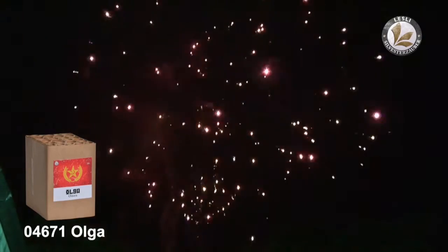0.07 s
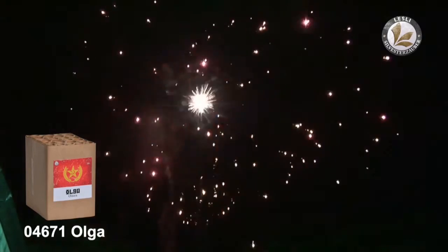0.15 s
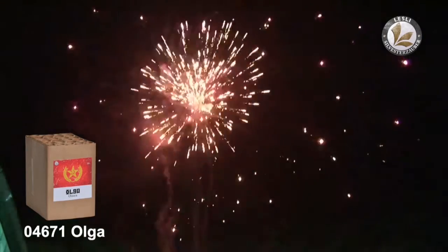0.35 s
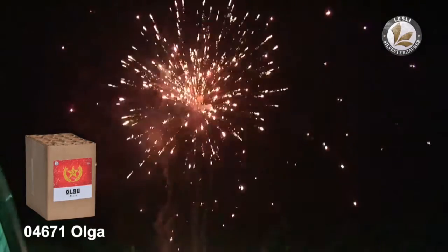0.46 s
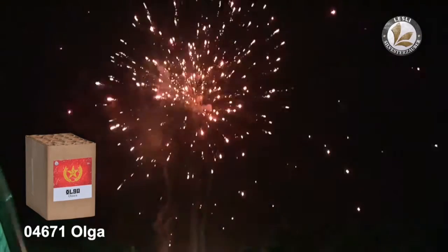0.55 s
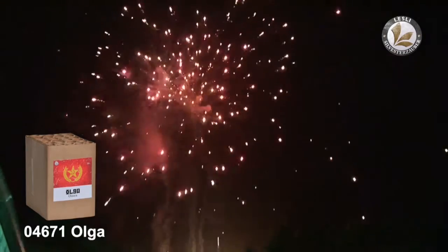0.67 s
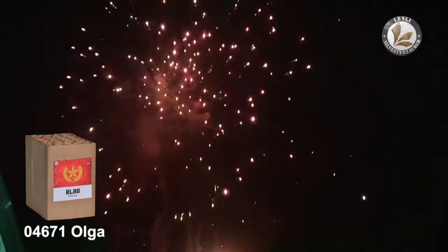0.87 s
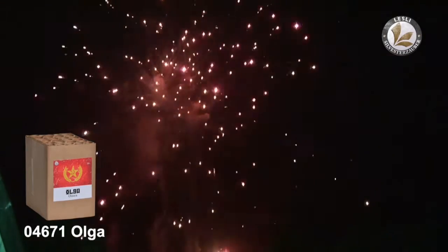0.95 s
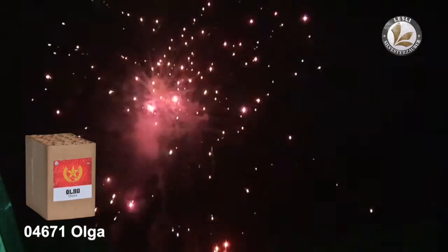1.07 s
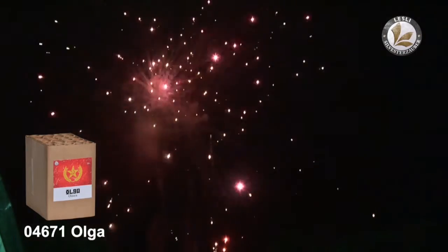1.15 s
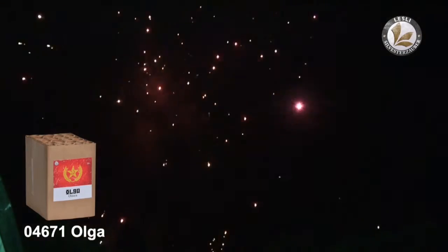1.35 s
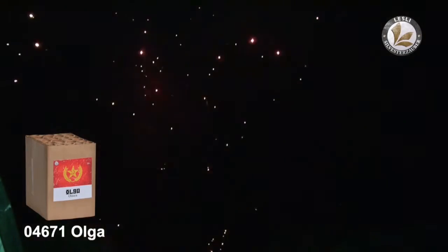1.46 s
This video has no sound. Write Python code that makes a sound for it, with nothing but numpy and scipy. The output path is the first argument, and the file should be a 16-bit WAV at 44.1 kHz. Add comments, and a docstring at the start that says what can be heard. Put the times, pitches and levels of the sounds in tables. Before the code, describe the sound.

A firework shell bursts with one sharp, loud bang just after a faint distant rumble. The bang briefly overloads the microphone, then rolls away across open ground with a few dull echoes over a faint sizzle of sparks.

```python
"""A firework shell bursts over open ground at night. At first the distant rumble of an earlier shot dies away
and burning stars hiss. At 0.24 s a thump from the mortar tube and the launch open a quick cluster of pressure
fronts, with ground scatter and hollow rings, that overloads the microphone. The surroundings then reflect a
dense roll and a few slaps. From 0.5 s the shot's own far rumble joins in, and the echoes decay over the hiss."""
import sys
import numpy as np
from scipy import signal
from scipy.fft import rfft, irfft
from scipy.io import wavfile
from scipy.ndimage import uniform_filter1d

SR = 44100
rng = np.random.default_rng(int(sys.argv[2]) if len(sys.argv) > 2 else 0)


def file_out(sig):
    """Save sig as 16-bit WAV at sys.argv[1]."""
    # one column per channel
    cols = np.atleast_2d(sig).T
    # limit, then scale
    lim = np.clip(cols, -1, 1)
    pcm = np.round(lim * 32767).astype(np.int16)
    wavfile.write(sys.argv[1], SR, pcm)


N = 66150
T = np.arange(N) / SR


def blast_wave(start, db, push_ms, pan_db, cutoff_hz, suction_gain=1.07):
    """Blast wave: a sudden overpressure, then a longer suction, dulled by air absorption."""
    phase = np.maximum(T - start, 0) / (push_ms / 1000)
    pressure = (T >= start) * (1 - phase) * np.exp(-phase)
    pressure = np.where(pressure > 0, pressure, suction_gain * pressure)
    return amp([[db + pan_db / 2], [db - pan_db / 2]]) * lowpass(pressure, cutoff_hz, order=2)


# Pressure fronts: t/s, level/dB, push duration/ms, left minus right/dB, cutoff f/Hz
PRESSURE_FRONTS = [(.2390, -2.5, 0.18, 5, 1400), (0.2454, 16, 0.31, 1, 3070), (0.2479, 1.5, 1.7, -2.5, 700),
                   (0.2624, 17.5, .55, -12, 7000), (0.2638, 6, 3.86, -7, 7050), (0.2729, 5.5, 2.7, 1, 910),
                   (0.2774, -10, 0.22, 6, 6000), (0.287, 6.5, 0.36, 8, 2800), (0.2864, -0.5, 1.8, 3, 1190)]
def burst():
    """Superposition: closely spaced blast waves, in inverted polarity, add to one bang."""
    return -sum(blast_wave(*front) for front in PRESSURE_FRONTS)


# Modes excited by the bang: t/s, f/Hz, level/dB, 60 dB decay time/s, rise time/s
HOLLOW_MODES = [(.2392, 900, -9, 0.013, 0.00024), (.2460, 669, -10, 0.055, 0.0026),
                (0.2502, 210, -6.5, 0.031, 0.00075), (0.28, 289.7, -8.5, 0.3, 0.01)]
def hollow_rings():
    """Damped resonance: each mode builds up quickly and decays exponentially."""
    rings = np.zeros(N)
    for start, hz, db, t60, rise in HOLLOW_MODES:
        age = np.maximum(T - start, 0)
        envelope = np.minimum(age / rise, 1) * amp(db - 60 * age / t60)
        rings += envelope * np.sin(2 * np.pi * hz * age)
    return rings


# Spectrum of the ground scatter: f/Hz, relative density/dB
GROUND_SPECTRUM = [(30, -14), (100, 2), (300, 4), (600, 2), (900, -5), (1400, -4.5), (2500, -8.5),
                   (5000, -17), (8000, -20), (15000, -31)]
# Clumps of that scatter: t/s, level/dB, time constant/s
GROUND_CLUMPS = [(0.2395, -18.5, 0.0078), (0.2446, -11.5, 0.0042), (0.2539, -17, .012),
                 (.2610, -9.5, 0.0024), (.2690, -17, 0.012), (0.276, -11, 0.013), (0.2844, -24.5, 0.014)]
# Stereo width of this and the later diffuse echoes: f/Hz, side minus mid/dB
ECHO_WIDTH = [(60, -3), (150, -9), (380, -8), (950, -7.5), (2380, -7), (5980, -2), (15000, 5.5)]
def ground_scatter():
    """Scattering: the ground close by returns the fronts as fast-decaying clumps of noise."""
    envelope = sum((T >= start) * amp(db) * np.exp(-np.maximum(T - start, 0) / decay)
                   for start, db, decay in GROUND_CLUMPS)
    return envelope * diffuse_noise(GROUND_SPECTRUM, ECHO_WIDTH, grain_db=4.5)


# Spectrum of the roll: f/Hz, relative density/dB
ROLL_SPECTRUM = [(15, -58), (25, -36), (33, -23.5), (169, -1), (253, -1), (281, 0), (349, -2), (410, 2),
                 (631, -3.5), (684, -4), (871, -9.5), (1200, -8), (1380, -13.5), (2060, -13), (2360, -15.5),
                 (8350, -25), (15500, -42)]
# Slow sag before the free decay: f/Hz, duration/s
ROLL_HOLD_TIME = [(50, 0.37), (250, 0.26), (500, 0.29), (1200, 0.24), (4000, 0.24), (9000, .21),
                  (14000, 0.2)]
# Free decay: f/Hz, 60 dB decay time/s
ROLL_DECAY_TIME = [(50, 0.87), (200, 0.92), (500, 1.19), (1200, 1.47), (3000, 1.5), (7000, 1.02),
                   (14000, 0.58)]
def roll(start=0.2556, rise_s=0.013, db=-15.5, sag_db_per_s=15.5):
    """Reverberation: dense echoes swell, sag slowly, then decay at a rate set by frequency."""
    echoes = diffuse_noise(ROLL_SPECTRUM, ECHO_WIDTH, grain_db=1)
    hz, t, bands = signal.stft(echoes, SR, nperseg=512)
    age = np.maximum(t - start, 0)
    decay_age = np.maximum(age - read(ROLL_HOLD_TIME, hz)[:, None], 0)
    sag_db = sag_db_per_s * (age - decay_age)
    decay_db = 60 * decay_age / read(ROLL_DECAY_TIME, hz)[:, None]
    _, fading = signal.istft(bands * amp(db - sag_db - decay_db), SR, nperseg=512)
    return fading[:, :N] * np.clip((T - start) / rise_s, 0, 1)


# Returns from far walls: t/s, level/dB, push duration/ms, left minus right/dB, cutoff f/Hz
WALL_ECHOES = [(0.3092, -5.5, 0.83, 4, 800), (0.4539, -4, 1.0, -6.5, 1310), (.4580, -11, 0.37, 17, 1200),
               (0.4765, -4.5, 0.93, -3.5, 1770), (0.649, -7, 1.1, -7, 1400), (.6523, -3.5, 0.81, -9, 1090),
               (0.6566, -11, 1, -3, 1100), (0.667, -12, 0.88, 0, 990), (.8140, -18, 2.8, 1, 900),
               (1.1605, -27, 0.63, -3, 990)]
def wall_slaps():
    """Specular reflection: far walls return single dull copies of the blast, with bass lost."""
    return highpass(sum(blast_wave(*echo) for echo in WALL_ECHOES), hz=157)


# Returns from distant houses or trees: peak t/s, level/dB, 1/e half-width/s
BROAD_ECHOES = [(0.379, -16.5, 0.0077), (.657, -25.5, 0.027), (.875, -40.5, 0.059), (0.938, -39.5, 0.016),
                (1.093, -43.5, 0.032)]
# Their spectrum: f/Hz, relative density/dB
BROAD_SPECTRUM = [(30, -37), (100, -16), (180, 1), (550, 6.5), (850, -14), (1250, 0.5), (1600, -19),
                  (4000, -27), (15000, -55)]
def broad_echoes():
    """Diffuse reflection: houses or trees smear the blast into bell-shaped swells."""
    envelope = sum(amp(db) * np.exp(-((T - peak) / half) ** 2) for peak, db, half in BROAD_ECHOES)
    return envelope * diffuse_noise(BROAD_SPECTRUM, ECHO_WIDTH, grain_db=3)


# Rumble of the earlier shot and of this one: t/s, level/dB, decay rate/(dB/s)
SHOT_RUMBLES = [(0, -34.5, 29), (0.498, -33, 11)]
# Its spectrum: f/Hz, relative density/dB
RUMBLE_SPECTRUM = [(15, -53), (25, -25), (135, -5.5), (192, -3.5), (299, -2.5), (327, -4), (510, -2),
                   (760, -12), (969, -9.5), (1320, -15.5), (1730, -15), (1970, -17), (5000, -27),
                   (6500, -46), (11000, -120)]
# Stereo width of the rumble and the stars: f/Hz, side minus mid/dB
DISTANT_WIDTH = [(60, -5), (150, -4), (380, -6), (950, -6.5), (2380, -6.5), (5980, -5.5), (15000, -1)]
def rumble():
    """Incoherent addition: the fading far echoes of two shots sum in power."""
    power = sum((T >= start) * amp(db - fade * (T - start)) ** 2 for start, db, fade in SHOT_RUMBLES)
    return np.sqrt(power) * diffuse_noise(RUMBLE_SPECTRUM, DISTANT_WIDTH, grain_db=1.5)


# Spectrum of the burning stars: f/Hz, relative density/dB
STAR_SPECTRUM = [(1000, -8), (3000, -11), (5500, 0), (8500, -0.5), (10500, -5), (15000, -9)]
# Their envelope: t/s, level/dB
STAR_ENVELOPE = [(0, -45.5), (.2, -48), (.6, -46.5), (1.05, -47.5), (1.3, -50.5), (1.5, -54)]
def stars():
    """Combustion noise: the burning stars give a fine, faint sizzle."""
    envelope = amp(np.interp(T, *np.transpose(STAR_ENVELOPE)))
    return envelope * diffuse_noise(STAR_SPECTRUM, DISTANT_WIDTH, grain_db=0.5)


def diffuse_noise(spectrum, width, grain_db):
    """Diffuse field: countless tiny arrivals of uneven size, in stereo; the mid signal has rms 1."""
    hz = np.fft.rfftfreq(N, 1 / SR)
    grains = amp(grain_db * np.repeat(rng.standard_normal(N // 64 + 1), 64)[:N])
    arrivals = rng.standard_normal((2, N)) * grains
    mid_bins, side_bins = rfft(arrivals) * amp(read(spectrum, hz))
    mid = irfft(mid_bins, N)
    side = irfft(side_bins * amp(read(width, hz)), N)
    return np.array([mid + side, mid - side]) / np.std(mid)


def amp(db):
    """Level to amplitude ratio."""
    return 10 ** (np.asarray(db) / 20)


def read(points, hz):
    """Interpolation on a log-frequency axis."""
    f, value = np.transpose(points)
    return np.interp(np.log(hz + 1), np.log(f + 1), value)


def lowpass(x, hz, order):
    """Causal low-pass filter."""
    return signal.sosfilt(signal.butter(order, hz, fs=SR, output="sos"), x)


def highpass(x, hz):
    """Causal first-order high-pass filter."""
    return signal.sosfilt(signal.butter(1, hz, "high", fs=SR, output="sos"), x)


# Lean to the left: f/Hz, left minus right/dB
LEFT_LEAN = [(100, 1.5), (500, 1.9), (1200, 2.9), (4000, 1), (9000, 0.5)]
def scene():
    """Superposition of all sources; a level difference between channels leans them slightly left."""
    bang = burst() + hollow_rings() + ground_scatter()
    mix = bang + roll() + wall_slaps() + broad_echoes() + rumble() + stars()
    mix = highpass(mix, hz=22)  # bass lost in the microphone
    lean_db = read(LEFT_LEAN, np.fft.rfftfreq(N, 1 / SR)) / 2
    return irfft(rfft(mix) * amp([lean_db, -lean_db]), N)


def record(dry, ceiling=0.83, threshold_db=-14, squeeze=0.41, attack_s=0.023, edge_hz=15750):
    """Saturation, then compression that clamps down fast and recovers slowly, then a band limit."""
    clipped = dry / (1 + (dry / ceiling) ** 6) ** (1 / 6)
    power = uniform_filter1d((clipped ** 2).mean(0), size=256)
    level_db = 10 * np.log10(abs(power) + 1e-12)
    fall_db = 27.5 * T  # the detector's held peak falls 27.5 dB/s
    peak_db = np.maximum.accumulate(level_db + fall_db) - fall_db
    excess_db = np.maximum(peak_db - threshold_db, 0)
    reduction_db = squeeze * lowpass(excess_db, 1 / (2 * np.pi * attack_s), order=1)
    band_limit = signal.firwin(511, edge_hz, window=("kaiser", 9), fs=SR)
    return signal.oaconvolve(clipped / amp(reduction_db), band_limit[None], "same")


dry = scene()
out = record(dry)
file_out(out)
```